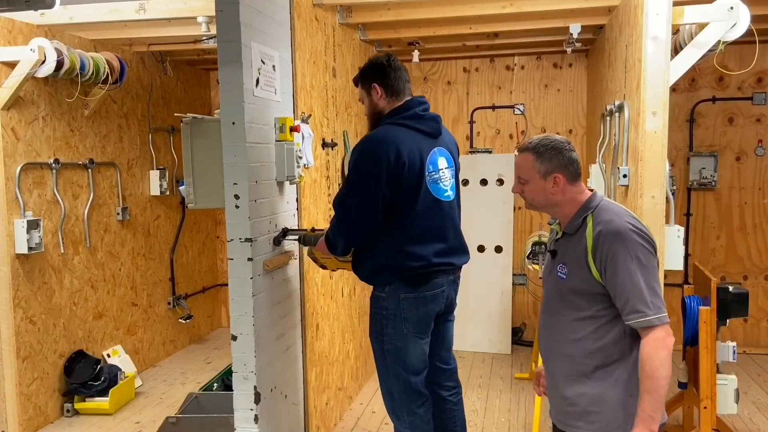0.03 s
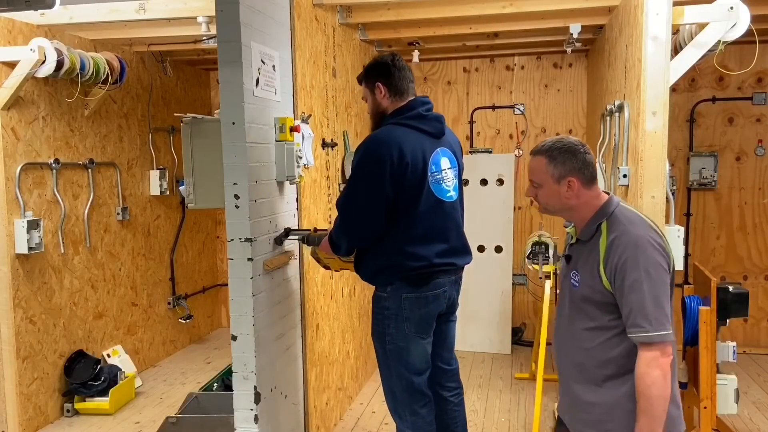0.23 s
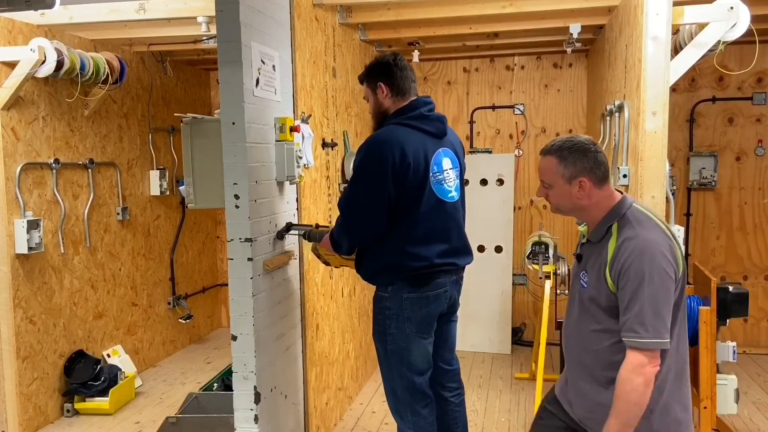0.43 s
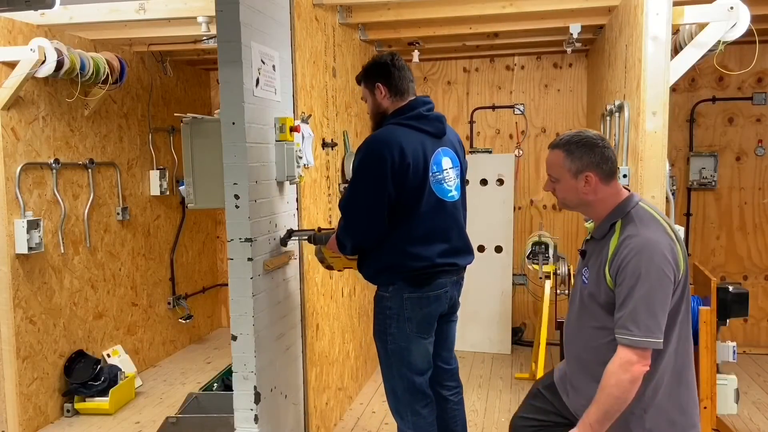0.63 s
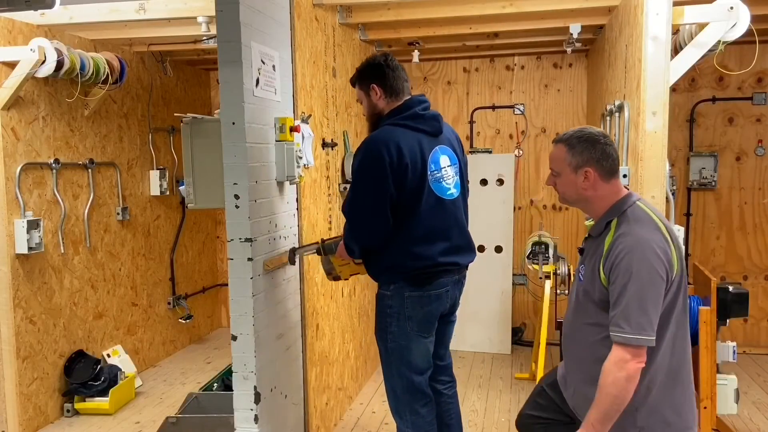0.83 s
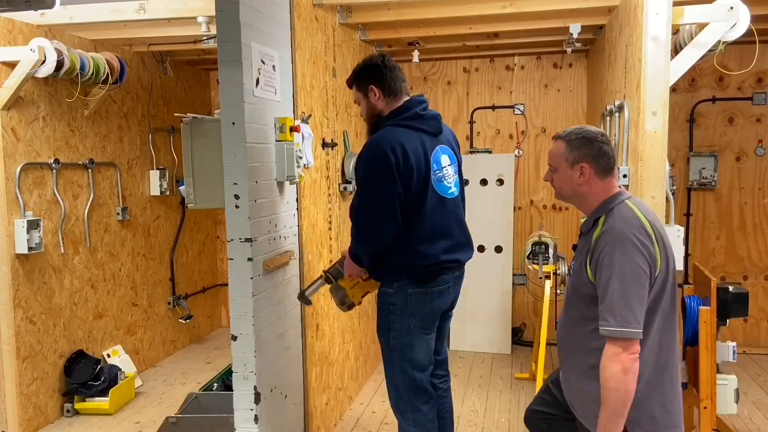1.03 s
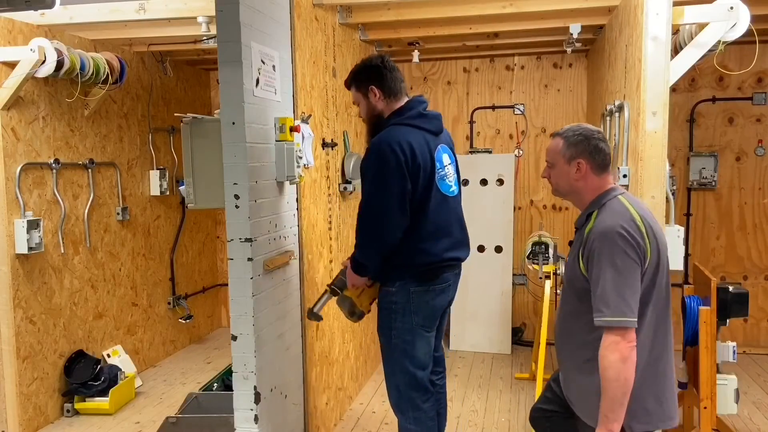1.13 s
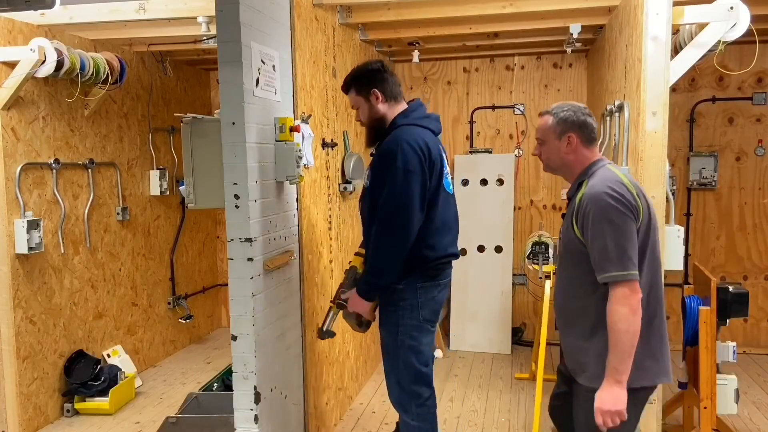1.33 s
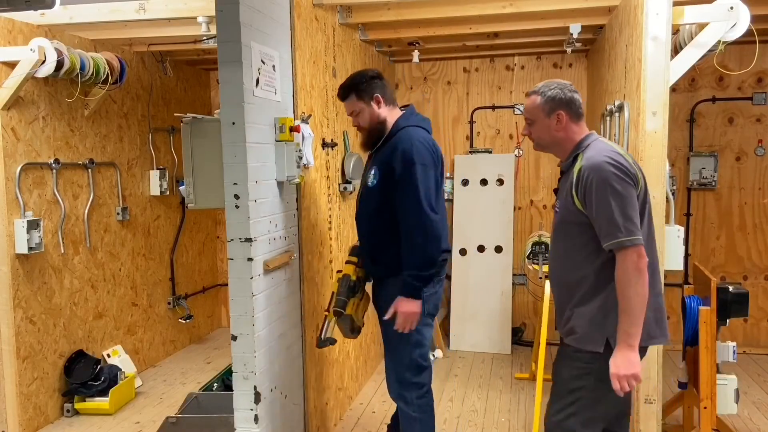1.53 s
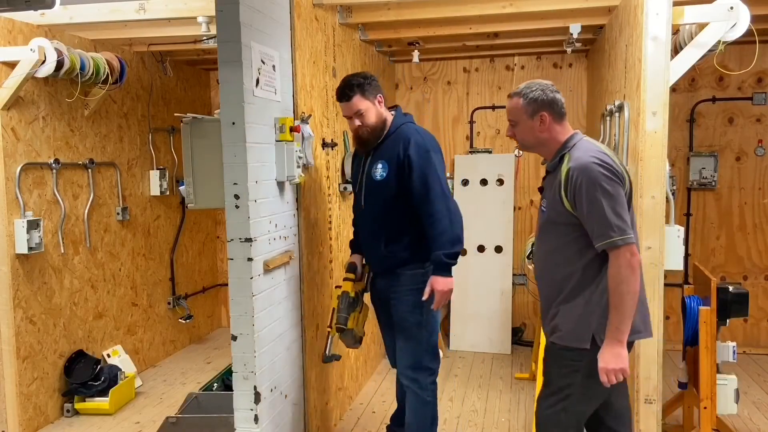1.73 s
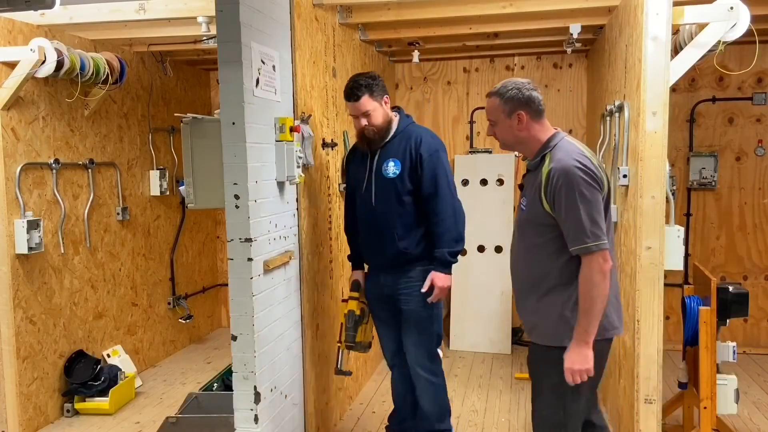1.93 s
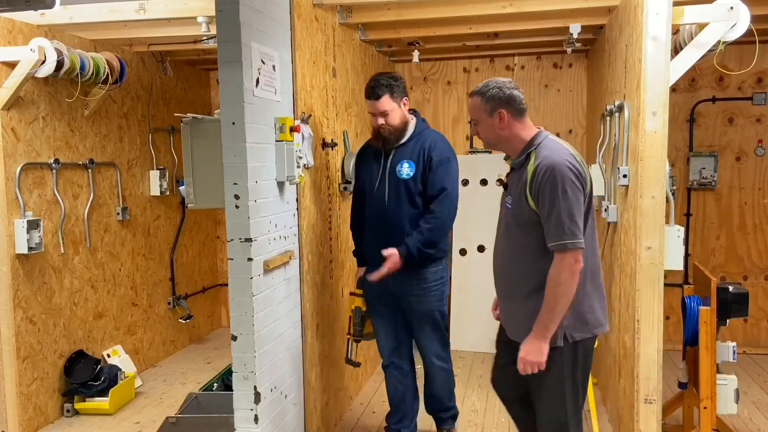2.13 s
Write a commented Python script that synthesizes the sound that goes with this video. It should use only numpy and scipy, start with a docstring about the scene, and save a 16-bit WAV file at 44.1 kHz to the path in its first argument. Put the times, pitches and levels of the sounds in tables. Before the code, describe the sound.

A cordless hammer drill whirs loudly, then its trigger is released and the whine slides down and dulls; small metal ticks, clothing rustle and soft wooden footsteps follow in a small workshop, picked up fairly close.

```python
"""A cordless hammer drill spins free of the wall in a small timber room: steady motor tones ride on
air and gear noise that is pulsed by the striker, while a low hum comes and goes underneath.
The trigger is released, and the drill coasts down as its tones fall and its noise turns dull.
Then clothing rustles as filtered noise, a few metal ticks ring as bundles of fading tones,
and shoes shuffle and knock on the wooden floor, whose boards ring as fading tones."""
import sys
import numpy as np
from scipy import signal
from scipy.fft import rfft, irfft, next_fast_len
from scipy.io import wavfile
from scipy.ndimage import uniform_filter1d, map_coordinates

SR = 44100
rng = np.random.default_rng(int(sys.argv[2]) if len(sys.argv) > 2 else 0)


def invert_db(level):
    """Linear amplitude ratio for a level in decibels (20 dB per decade), elementwise."""
    return 10 ** (np.asarray(level, dtype=float) / 20)


def master_out(mix):
    """Clip the mix to full scale and print it as 16-bit PCM to the path in sys.argv[1]."""
    frames = np.transpose(np.atleast_2d(mix))
    ceiling = np.clip(frames, -1, 1)
    pcm = np.round(ceiling * 32767).astype(np.int16)
    wavfile.write(sys.argv[1], SR, pcm)


N = 95564
T = np.arange(N) / SR


def unit(x):
    """Scales a signal to an rms of 1."""
    return x / np.sqrt(np.mean(x ** 2) + 1e-20)


def along(points, hz):
    """Reads a value at each frequency, joining the (Hz, value) points on a log axis."""
    f, v = np.transpose(points)
    return np.interp(np.log(hz + 1), np.log(f + 1), v)


def curves(rows):
    """Gives one value per sample for each column after the time."""
    s, *columns = np.transpose(rows)
    return [np.interp(T, s, column) for column in columns]


def wobble(rate):
    """Draws a smooth random curve with rate knots a second."""
    return map_coordinates(rng.standard_normal(N // 20), [T * rate])


def rush(spectrum, patchy_db):
    """Makes noise of rms 1 with patches of random gain; only the shape of the spectrum counts."""
    z = signal.stft(rng.standard_normal(N), nperseg=256)[2]
    field = uniform_filter1d(rng.standard_normal(z.shape), size=4, axis=0)
    field = uniform_filter1d(field, size=5, axis=1)
    patchy = signal.istft(z * invert_db(patchy_db * unit(field)), nperseg=256)[1][:N]
    m = next_fast_len(N + 8192)
    colour = invert_db(along(spectrum, np.fft.rfftfreq(m, 1 / SR)))
    return unit(irfft(rfft(patchy, m) * colour, m)[:N])


# colour of the background noise: f/Hz, level/dB
BACKGROUND_COLOUR = [(12, -52.5), (20, -35.5), (157, -9.5), (232, -15), (281, -13.5), (439, -17.5),
                     (549, -10.5), (705, -25.5), (1450, -25.5), (11700, -49), (15500, -46.5)]


def background():
    """Soft noise stays in the background, its level drifting slowly."""
    return invert_db(-60.5 + 0.5 * wobble(2.7)) * rush(BACKGROUND_COLOUR, patchy_db=3)


# how the hum comes and goes: t/s, level/dB
HUM_LEVEL = [(0, -69), (.1, -57.5), (.3, -61.5), (.6, -89), (.85, -77.5), (1.4, -74), (1.7, -97),
             (1.85, -61), (2.17, -69.5)]


def hum():
    """A low tone wavers a little in level and phase."""
    level = invert_db(curves(HUM_LEVEL)[0] + 1.5 * wobble(17))
    hum_hz = 71.4
    return level * np.sqrt(2) * np.sin(2 * np.pi * hum_hz * T + 0.7 * wobble(30))


# how strongly the shoes rub: t/s, level/dB
SHUFFLE_LEVEL = [(1.1, -80), (1.2, -67), (1.36, -67.5), (1.42, -53.5), (1.55, -53), (1.6, -59.5),
                 (1.75, -62.5), (1.82, -67.5), (1.93, -63.5), (2.1, -61.5)]
# colour of soles on boards: f/Hz, level/dB per Hz
SOLE_COLOUR = [(60, -24.5), (100, -5.5), (150, 1), (220, -1), (300, -3.5), (450, -7.5), (620, -7),
               (800, -19.5), (1200, -39.5)]


def shuffle():
    """Shoes rub on the boards between the knocks: low, lumpy noise."""
    started = T > SHUFFLE_LEVEL[0][0]
    level = invert_db(curves(SHUFFLE_LEVEL)[0] + 2.5 * wobble(30))
    return started * level * rush(SOLE_COLOUR, patchy_db=3)


# a thin whistle in the rustle: t/s, f/Hz, level/dB
WHISTLE_PATH = [(1.36, 11400, -92), (1.39, 11700, -82), (1.44, 12200, -80), (1.47, 12800, -78),
                (1.5, 13200, -89)]


def whistle():
    """A faint tone rises in pitch within the rustle."""
    hz, level_db = curves(WHISTLE_PATH)
    sounding = (T > WHISTLE_PATH[0][0]) * (T < WHISTLE_PATH[-1][0])
    return sounding * invert_db(level_db + 3 * wobble(60)) * np.sin(2 * np.pi * np.cumsum(hz) / SR)


# how the fabric rubs: t/s, rustle level/dB, then added to it: treble level/dB, top level/dB
CLOTH_LEVELS = [(0.95, -77.5, -13, -30), (0.98, -84, 13, 3.5), (0.99, -92.5, -7, -8.5),
                (1.036, -86.5, -8, -15.5), (1.074, -69, -20.5, -25), (1.088, -73.5, -9, -22),
                (1.122, -65, -13, -16.5), (1.244, -61, -12, -20.5), (1.554, -56.5, -5.5, -23),
                (1.642, -56, -5.5, -17.5), (1.76, -62.5, -10.5, -16.5), (1.804, -70.5, -19, -25.5),
                (1.818, -74.5, -14, -25), (1.866, -84, -7, -18.5), (1.946, -74.5, -0.5, 6),
                (1.974, -58, -11, -11.5), (2.018, -64, -3.5, -3.5), (2.165, -55.5, -5.5, -7)]
# colours of the body, the treble and the top of the rustle: f/Hz, level/dB per Hz
CLOTH_BODY_COLOUR = [(180, -30.5), (300, -6.5), (459, -6.5), (538, -8.5), (844, -7), (1100, -7.5),
                     (1290, -10), (2230, -8.5), (5500, -21), (7150, -27), (12100, -120)]
CLOTH_TREBLE_COLOUR = [(2940, -28), (5000, -7), (5560, -10.5), (7600, -1.5), (8690, -5), (10500, -16),
                       (13600, -41), (22000, -120)]
CLOTH_TOP_COLOUR = [(8500, -24.5), (10000, -3), (11600, -2.5), (13000, -6.5), (14500, -9.5), (15600, -10.5)]


def cloth():
    """Fabric rubs: three layers of noise share one unsteady level."""
    level_db, treble_db, top_db = curves(CLOTH_LEVELS)
    fade_in = np.clip((T - CLOTH_LEVELS[0][0]) / 0.0507, 0, 1)
    rub = invert_db(4.5) * rush(CLOTH_BODY_COLOUR, patchy_db=0)
    rub += invert_db(treble_db) * rush(CLOTH_TREBLE_COLOUR, patchy_db=-1.5)
    rub += invert_db(top_db) * rush(CLOTH_TOP_COLOUR, patchy_db=1.5)
    return fade_in * invert_db(level_db + 0.99 * wobble(36)) * rub


# metal ticks: t/s, level/dB, middle f/Hz, time to fade by 60 dB/s, spread of the pitches (no unit)
METAL_TICKS = [(.753, -54, 11600, .015, 0.05), (0.823, -56, 7450, 0.037, .06),
               (0.916, -60, 5040, .012, .12), (0.976, -65, 6700, 0.041, .008),
               (.975, -69.5, 11200, .06, 0.01), (1.572, -58, 12000, .03, .13),
               (1.967, -47.5, 3170, 0.029, 0.51)]


def ticks():
    """Small metal parts touch: a bundle of close tones starts at once and fades."""
    out, t = np.zeros(N + SR), T[:SR // 10]
    rings = 20
    for s, db, hz, t60, spread in METAL_TICKS:
        jitter, phase = rng.uniform(size=(2, rings, 1))
        place = (np.arange(rings)[:, None] + jitter) / rings - 0.5  # -0.5 lowest, 0.5 highest
        tones = hz * np.exp(3 * spread * place)
        ring = np.sin(2 * np.pi * (tones * t + phase)).sum(0) / np.sqrt(rings)
        start = round(s * SR)
        out[start:start + len(t)] += invert_db(db - 60 * t / t60) * ring
    return out[:N]


# knocks on the floor: t/s, level/dB, time for 200 Hz to fade by 60 dB/s,
# f/Hz where the contact is strongest, its reach/octaves
FLOOR_KNOCKS = [(.886, -53.5, 0.13, 514, .5), (.906, -36.5, 0.21, 151.4, 0.26), (.92, -53.5, 0.1, 560, 1.5),
                (1.038, -48.5, 0.14, 149.6, 0.23), (1.12, -47, 0.14, 210, 0.24),
                (1.385, -55.5, 0.26, 560, 0.92), (1.416, -35.5, 0.16, 198, 0.87),
                (1.432, -52, .12, 620, 0.87), (1.466, -45.5, 0.12, 645, 0.67),
                (1.492, -34.5, 0.25, 198, 0.82), (1.522, -42, 0.085, 129.8, .6),
                (1.54, -43.5, .08, 366, .7), (1.6, -44, 0.09, 170, 1.5), (1.685, -49, 0.25, 500, .3),
                (1.691, -44.5, 0.18, 149.7, 0.65), (1.793, -41.5, 0.11, 166, 0.59),
                (1.886, -42, .1, 161, 0.38), (2.113, -19.5, 0.21, 201, 0.57),
                (2.1145, -26.5, 0.074, 566, 1.06), (2.12, -35.5, .06, 1900, 0.48),
                (2.126, -23.5, .06, 1100, 0.66), (2.136, -26, 0.078, 453, 1.7)]
# tones of the floor boards: f/Hz, level/dB
BOARD_TONES = [(105, -2), (150, -2), (180, -4), (213, -3.5), (250, -13), (295, -4.5), (380, -5.5),
               (460, -2), (538, 5.5), (610, -1), (690, -6), (780, -8.5), (890, -3.5), (1000, -7.5),
               (1180, -5.5), (1350, -8), (1550, -7), (1800, -3), (2050, -4.5)]


def knocks():
    """Each soft blow rings the floor boards, most near the pitch that its contact favours."""
    out, t = np.zeros(N + SR), T[:SR // 3]
    soft_start = 1 - np.exp(-t / 0.006)
    for s, db, t60, centre_hz, reach in FLOOR_KNOCKS:
        ring = np.zeros(len(t))
        # no two knocks ring a board alike
        lucks, detunes = rng.standard_normal((2, len(BOARD_TONES)))
        for (hz, board_db), luck, detune in zip(BOARD_TONES, lucks, detunes):
            contact_db = -8.3 * (np.log2(hz / centre_hz) / reach) ** 2
            fade_db = -60 * t / t60 * (hz / 200) ** 0.2  # higher tones die sooner
            tone = np.sin(2 * np.pi * hz * (1 + 0.025 * detune) * t)
            ring += invert_db(board_db + contact_db + 2.4 * luck + fade_db) * tone
        start = round(s * SR)
        out[start:start + len(t)] += invert_db(db) * ring * soft_start
    return out[:N]


# how long the room rings: f/Hz, time to fade by 60 dB/s
ROOM_FADE = [(150, 0.16), (1000, .3), (5000, 0.28), (12000, .15)]


def room(x):
    """The room answers with fading noise in which each frequency dies at its own speed."""
    hz, t, z = signal.stft(rng.standard_normal(SR // 2), SR, nperseg=256)
    fade = invert_db(-60 * t / along(ROOM_FADE, hz)[:, None])
    tail = signal.istft(z * fade, SR, nperseg=256)[1]
    late = np.pad(x, (200, 0))  # the answer starts 200 samples later
    return signal.fftconvolve(late, tail / np.linalg.norm(tail))[:N]


# casing resonances: f/Hz, half width f/Hz, lift level/dB
CASING_PEAKS = [(860, 50, 14), (2130, 120, 9), (4150, 300, 10)]


def casing_lift_db(hz):
    """The casing resonates, so it lifts a tone that glides through one of its peaks."""
    return sum(db / (1 + ((hz - centre) / width) ** 2) for centre, width, db in CASING_PEAKS)


# motor tones: multiple of shaft speed (no unit), starting level/dB, change in level/dB without power
MOTOR_TONES = [(1, -45, 0), (1.862, -47, 2), (2, -42.5, 13.5), (4, -36, -6.5), (4.275, -40.5, -12),
               (6.33, -39.5, -7.5), (7.813, -34, -7), (8, -35.5, 3.5), (8.93, -46.5, -5),
               (9.3, -38.5, -0.5), (12, -38, -0.5), (15, -39.5, -4)]


def motor_tones(speed):
    """The motor sounds at multiples of the shaft speed, with unsteady level and phase."""
    turn = 2 * np.pi * np.cumsum(speed) / SR
    # from 0 under power to 1 once 5.1 % of the speed is lost
    cut = np.clip((1 - speed / speed[0]) / 0.051, 0, 1)
    out = np.zeros(N)
    for k, db, cut_db in MOTOR_TONES:
        lift_db = casing_lift_db(k * speed) - casing_lift_db(k * speed[0])
        sway_db = (3.2 + 1.6 * cut) * wobble(25)
        phase = k * turn + 0.06 * np.sqrt(k) * wobble(40) + rng.uniform(0, 8.2)
        out += np.sqrt(2) * invert_db(db + cut * cut_db + lift_db + sway_db) * np.sin(phase)
    return out


# the striker: t/s, blow rate f/Hz, strength of the pulses in the treble (no unit)
STRIKER_BLOWS = [(0, 72.7, .15), (.56, 72.7, .18), (.62, 72, .45), (.69, 68, .45), (.72, 58, .05),
                 (.9, 40, .05)]


def striker_pulse():
    """Each blow swells the noise and each gap thins it: a peaked wave around zero."""
    rate, strength = curves(STRIKER_BLOWS)
    blows = np.cumsum(rate) / SR
    blows -= np.interp(0.65, T, blows)  # one blow falls at 0.65 s
    beat = np.exp(1.2 * np.cos(2 * np.pi * blows))  # 1.2 sets how sharp a blow is
    return strength * (beat / beat.mean() - 1)


# colours of the casing and air roar, at speed and near standstill: f/Hz, level/dB per Hz
FAST_ROAR_COLOUR = [(160, -60.5), (280, -26.5), (388, -10.5), (432, -11.5), (753, -19.5), (1090, -3),
                    (1610, -1.5), (2910, -2.5), (3160, -7), (3280, -4.5), (4540, -9.5), (5000, -28.5),
                    (6500, -34), (11000, -120)]
SLOW_ROAR_COLOUR = [(160, -56), (280, -17), (454, -14.5), (557, -28.5), (819, 2), (924, -10.5), (1280, -7),
                    (1410, -5), (5000, -23), (6500, -54), (11000, -120)]


def roar(speed):
    """Casing and air roar; the noise crosses over to a duller one as the shaft slows."""
    lost = 1 - speed / speed[0]
    dull_from, dull_by = 0.28, 0.66  # shares of speed lost
    dull = np.pi / 2 * np.clip((lost - dull_from) / (dull_by - dull_from), 0, 1)
    fast = np.cos(dull) * rush(FAST_ROAR_COLOUR, patchy_db=0.5)
    return fast + np.sin(dull) * rush(SLOW_ROAR_COLOUR, patchy_db=2.5)


# the shaft: t/s, speed f/Hz
SHAFT_SPEED = [(0, 389.9), (.465, 389.9), (.49, 367), (.53, 333), (.59, 272), (.62, 253), (.65, 218),
               (.72, 170), (.85, 80)]
# the drill's layers: t/s, overall level/dB, then added to it: treble level/dB, body level/dB,
# motor tones level/dB, top level/dB, rumble level/dB
DRILL_LEVELS = [(0, -22.5, -5.5, 0, 3.5, -21, -22.5), (.15, -22.5, -6, 0, 0, -21.5, -21.5),
                (.22, -21, -7, -9, 0, -24, -18.5), (.3, -22, -6, 0, 2.5, -23, -20),
                (.465, -22, -6, 0, 3, -23.5, -27), (.52, -21.5, -8, 0, -9, -24.5, -31.5),
                (.58, -26.5, -8, 0, 1.5, -27, -21), (.64, -26, -12.5, -4, -13, -31.5, -28.5),
                (.69, -31.5, -15.5, 0, -7, -28, -32), (.74, -36.5, -22, -2, -17, -33.5, -29.5),
                (.77, -43, -19, -1, -10, -31, -24), (.81, -51.5, -15, 0, -16, -25, -28),
                (.87, -59.5, -11.5, 4, -13, -26.5, -28), (.95, -67.5, -17, 0.6, -11, -28.5, -26)]
# colours of the treble, the thinnest hiss, the hollow of the dust box and the rumble:
# f/Hz, level/dB (per Hz in the last three)
TREBLE_COLOUR = [(3000, -7), (4500, 1), (5000, 2), (5900, 3), (6900, 2.5), (8000, -5.5), (9400, -4.5),
                 (10300, -12.5), (11500, -41.5)]
TOP_COLOUR = [(9000, -31), (10400, 1), (11700, -0.5), (12800, -3), (14300, -13.5), (15500, -15.5)]
BODY_COLOUR = [(300, -31.5), (550, 0), (800, 8.5), (1100, -7), (1500, -39)]
RUMBLE_COLOUR = [(30, -31), (50, -24), (75, -23.5), (100, -16), (140, -1), (210, 2.5), (260, -3),
                 (330, 6.5), (450, -16.5)]


def drill():
    """Motor tones ride on noise; the striker pulses its roar and treble but not its body."""
    speed, = curves(SHAFT_SPEED)
    level_db, treble_db, body_db, tone_db, top_db, rumble_db = curves(DRILL_LEVELS)
    pulse = striker_pulse()
    air = roar(speed) * (1 + 0.3 * pulse)  # the roar pulses less than the treble
    hiss = invert_db(treble_db) * rush(TREBLE_COLOUR, patchy_db=1)
    hiss += invert_db(top_db) * rush(TOP_COLOUR, patchy_db=1)
    hiss *= 1 + pulse
    body = invert_db(body_db - 7) * rush(BODY_COLOUR, patchy_db=1)
    rumble = invert_db(rumble_db) * rush(RUMBLE_COLOUR, patchy_db=1.5)
    # the tones have levels of their own, so take off the usual level of the first third of a second
    tones = motor_tones(speed) * invert_db(tone_db - level_db[:SR // 3].mean())
    fade_out = np.clip((DRILL_LEVELS[-1][0] + 0.046 - T) / 0.045, 0, 1)
    return fade_out * invert_db(level_db) * (air + hiss + body + rumble + tones)


def scene():
    """Adds all the sounds; the knocks and ticks also ring on in the room."""
    hits = knocks() + ticks()
    mix = background() + drill() + hits
    mix += invert_db(-17) * room(hits)
    mix += whistle() + cloth() + shuffle() + hum()
    return mix[None]


def low_pass(x):
    """Removes everything above the highest recorded frequency."""
    return signal.sosfilt(signal.butter(12, 15640, fs=SR, output="sos"), x)


def record(dry):
    """The microphone loses the deepest bass, below about 46 Hz."""
    hz = np.fft.rfftfreq(N, 1 / SR)
    bass_cut = 1 / np.sqrt(1 + (45.6 / (hz + 1)) ** 4)
    mix = irfft(rfft(dry) * bass_cut, N)
    return low_pass(mix)


dry = scene()
out = record(dry)
master_out(out)
```